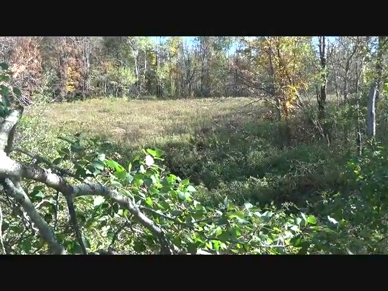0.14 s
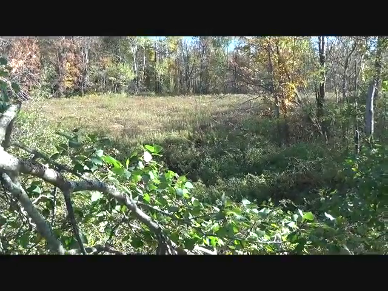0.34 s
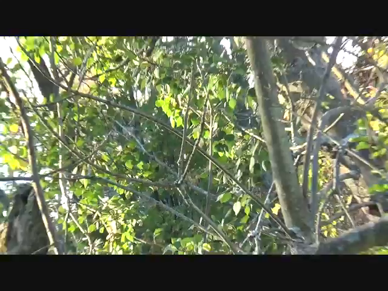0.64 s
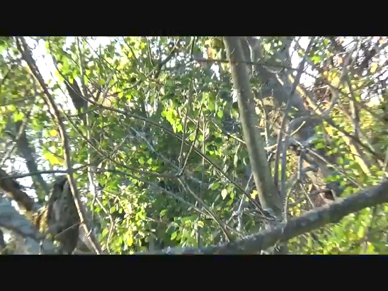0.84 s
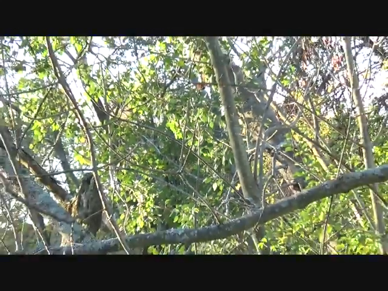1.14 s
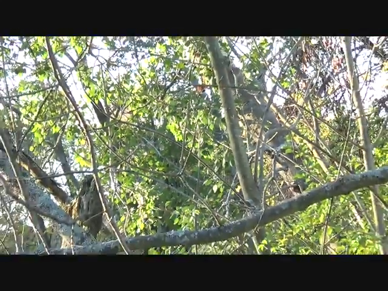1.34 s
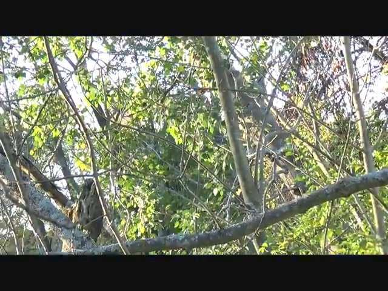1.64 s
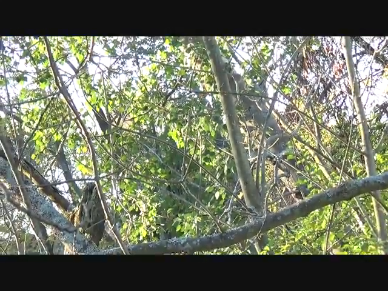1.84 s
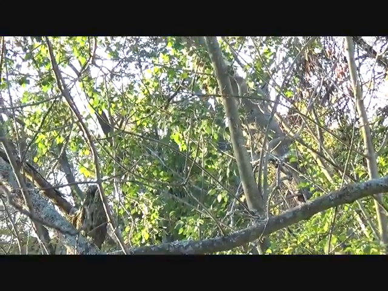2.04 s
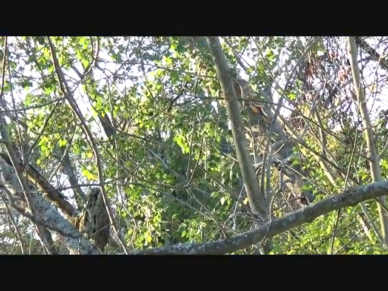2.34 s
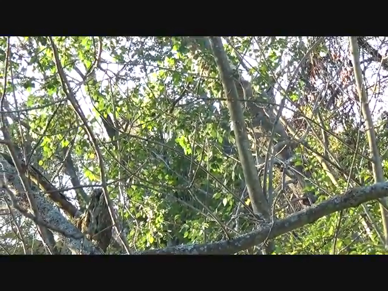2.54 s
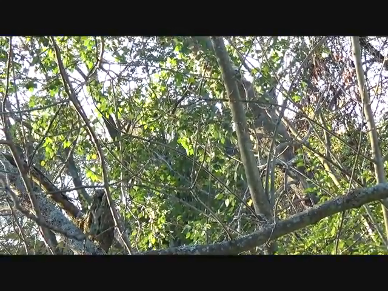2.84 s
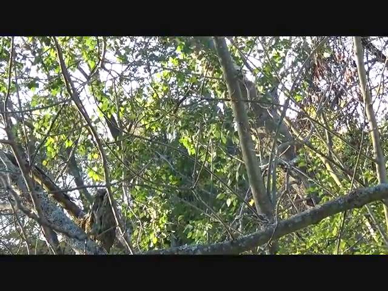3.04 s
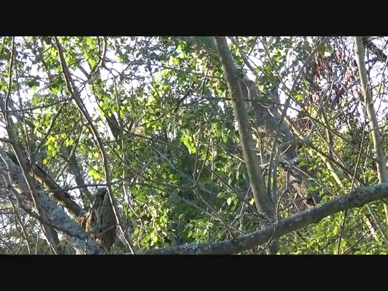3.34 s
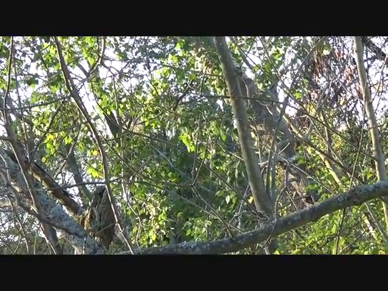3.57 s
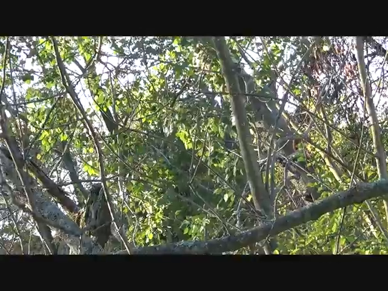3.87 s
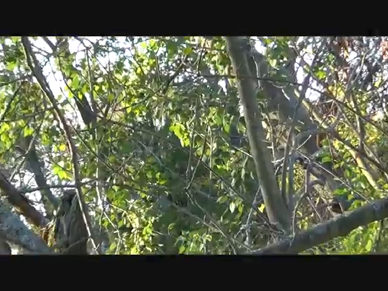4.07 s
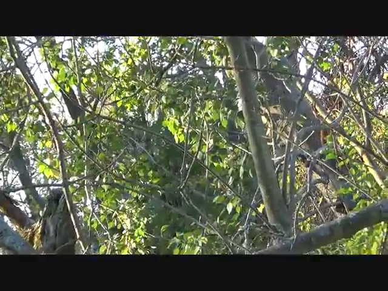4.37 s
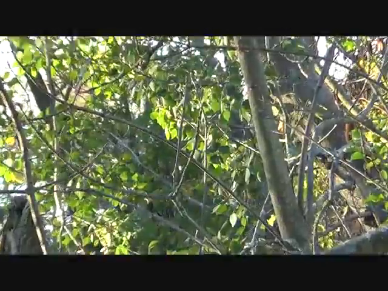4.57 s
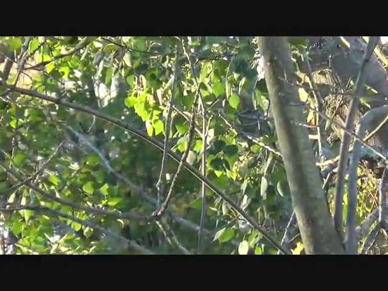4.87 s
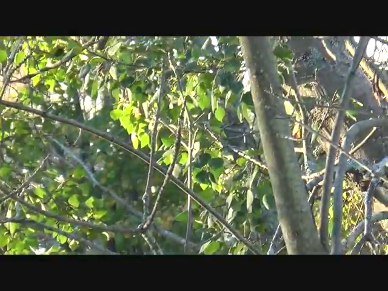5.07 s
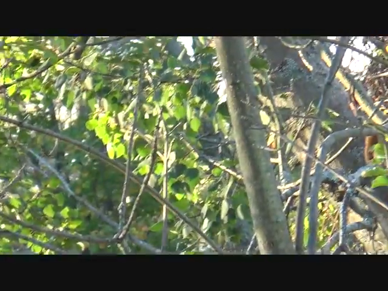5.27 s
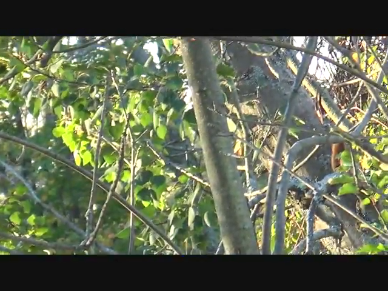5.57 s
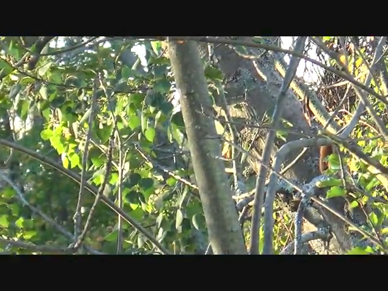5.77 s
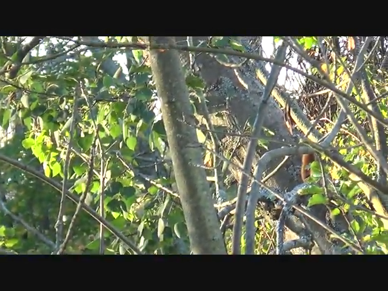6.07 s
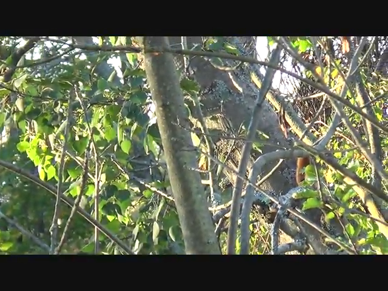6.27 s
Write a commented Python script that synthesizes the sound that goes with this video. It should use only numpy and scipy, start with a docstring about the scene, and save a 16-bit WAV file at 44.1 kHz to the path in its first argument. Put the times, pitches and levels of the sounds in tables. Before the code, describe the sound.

Soft outdoor air among trees runs throughout, with a faint distant engine drone, a thin, very high electronic whine and occasional faint bird whistles. The level drops for an instant at about 0.6 seconds. From 0.8 to 1.3 seconds, small twig ticks and soft knocks sound close by, followed by one sharp snap at 1.4 and a few more faint ticks just before 3 seconds. At about 3.7 seconds a squirrel straight ahead starts a loud, rapid rattle of sharp, squeaky, buzzing notes, lightly scattered by leaves and trunks. It begins tense and bright, then softens in tone and slows, stopping at about 6 seconds. A harder click comes near 4 seconds, and several soft knocks follow until about 5.2. The air and leafy rustle swell a little from 4 seconds and carry on to the end, around 6.4 seconds.

```python
"""Under the trees, a squirrel rattles off some sixty sharp notes that slow down at the end.
Each note is a tiny falling squeak and a dozen voice pulses, scattered back by leaves and trunks.
Twigs tick and small knocks sound close by, before and during the call. Behind them are soft outdoor
air, a far engine, faint birds and the thin whine of a camera. Early on, the level dips briefly."""
import sys
import numpy as np
from scipy import signal
from scipy.fft import rfft, irfft
from scipy.io import wavfile
from scipy.ndimage import uniform_filter1d

SR = 44100
rng = np.random.default_rng(int(sys.argv[2]) if len(sys.argv) > 2 else 0)


def unload_wav(signal):
    """Save mono or channel-first audio to the path in sys.argv[1] as 16-bit WAV at rate SR, clipped to [-1, 1]."""
    wavfile.write(
        sys.argv[1],
        SR,
        np.round(np.clip(np.atleast_2d(signal).T, -1, 1) * 32767).astype(np.int16),
    )


N = 282681
TIME = np.arange(N) / SR

# the voice starts tense and bright, then relaxes: (time [s], effort [dB], pitch [Hz], brightness [dB])
VOICE = [(3.67, -30, 1147, 5), (3.7, -27.5, 976, 5.5), (3.81, -26.5, 959, 9), (4.08, -24.5, 949, 9.5),
         (4.32, -25.3, 951, 5.5), (4.4, -26, 966, -2), (4.75, -23.6, 956, -2.5), (5.2, -24, 906, -2.5),
         (5.97, -25, 896, -5.7), (6.04, -28.5, 755, -5)]
# the rattle slows down: (time [s], pace [notes per second])
PACE = [(3.67, 31.01), (3.73, 29.5), (4.85, 26.19), (5.03, 24.71), (5.2, 25.22), (5.55, 22.67),
        (5.72, 19.77), (5.87, 19.79), (5.98, 15.85)]


def squirrel(start_s=3.6698, end_s=6.06):
    """The squirrel calls note after note, each a little different by chance."""
    out, s = np.zeros(N), start_s
    while s < end_s:
        effort_db, pitch_hz, bright_db = follow(VOICE, s)
        louder, higher, brighter = rng.standard_normal(3)
        age = s - start_s
        sound = note(pitch_hz * (1 + .02 * higher), bright_db + .5 * brighter,
                     squeak_db=-.4 * bright_db,  # a relaxed throat squeaks more
                     chest_db=-31 - age - effort_db,  # ignores effort, fades 1 dB a second
                     length_s=.012 + .00065 * age)
        add(out, s - .0038, gain_of(effort_db + .6 * louder) * sound)  # the squeak comes just ahead
        s += 1 / follow(PACE, s)[0]
    return out


# the lower part of the voice: (frequency [Hz], gain [dB])
CHEST_TONE = [(500, -42), (780, -5), (920, -5), (1350, -23), (1950, -12.5), (2400, -12), (2900, -6),
              (4000, -1), (4600, 4.5), (5600, -3.5), (6400, 1.5), (7400, -7.5), (9000, -17.5), (16000, -42)]
# the upper part of the voice: (frequency [Hz], gain [dB])
THROAT_TONE = [(3000, -41.5), (7000, -40), (8300, -15.5), (9100, -6.5), (9900, 1), (10600, -3.5),
               (11300, -1.5), (12200, 0), (13300, -3), (13900, -15.5), (16000, -16)]


def note(pitch_hz, bright_db, squeak_db, chest_db, length_s, jitter=.024, flutter_db=1.6, size=2048):
    """A falling squeak breaks into a short run of pulses that slow as the mouth closes."""
    t, hz = np.arange(size) / SR, np.fft.rfftfreq(size, 1 / SR)
    later, louder = rng.standard_normal((2, 24))
    progress = np.minimum(np.arange(24) / (pitch_hz * length_s), 1)
    fall = .2715 * (1 + .16 * rng.standard_normal())  # no two notes drop alike
    pulse_hz = pitch_hz * np.exp(-fall * (progress - .42))
    pulse_s = .0035 + np.cumsum((1 + jitter * later) / pulse_hz)
    age = (pulse_s - pulse_s[0]) / length_s  # pulses past 1 are silent
    push = np.interp(age, [0, .2, .55, .8, 1], [.3, .62, .78, .53, .31], right=0)
    push *= gain_of(flutter_db * louder)
    delays = np.exp(-2j * np.pi * hz[:, None] * pulse_s)  # puts each pulse at its time
    rasp = .09 * np.interp(t, pulse_s, push, left=0) * rng.standard_normal(size)
    top_band = np.exp(-((hz - 12250) / 1550) ** 4)  # a tense throat rings more up here
    throat = colour(irfft(delays @ push) + rasp, read(THROAT_TONE, hz) + (bright_db - 3.5) * top_band)
    closing = gain_of(-13 * np.clip(age - .25, 0, 1))  # the closing mouth fades only the lower part
    chest = colour(irfft(delays @ (push * closing)) + rasp, read(CHEST_TONE, hz))
    buzz = (unit_rms(throat) + gain_of(chest_db - 3.5) * unit_rms(chest)) * np.sqrt(length_s * SR / size)
    low = gain_of(-12) * squeak(t, .00311, .001, 3745, -420000)
    high = gain_of(-4.5) * squeak(t, .00485, .0018, 9450, -260000)
    return buzz + gain_of(squeak_db) * (low + high)


def squeak(t, middle_s, spread_s, centre_hz, slide_hz_per_s):
    """A clean whistle slides down for a few milliseconds."""
    hz = centre_hz * (1 + .0228 * rng.standard_normal()) + slide_hz_per_s * (t - middle_s)
    return np.exp(-.5 * ((t - middle_s) / spread_s) ** 2) * np.sin(2 * np.pi * np.cumsum(hz) / SR)


# dry twig ticks: (time [s], peak of the snap [dB])
TWIGS = [(.782, -43), (1.1166, -34), (1.16, -38), (1.224, -38.5), (1.261, -42), (1.41, -13), (2.707, -39),
         (2.788, -32), (2.949, -36.5)]


def twigs(faint_per_s=3, faint_db=-47):
    """Each twig gives a bright snap over duller wood; the smallest tick at random."""
    out = np.zeros(N)
    faint = [(s, faint_db) for s in TIME[rng.random(N) < faint_per_s / SR]]
    for s, db in TWIGS + faint:
        snap = burst(db, centre_hz=9500, octaves=.38, decay_s=.00062)
        wood = burst(db - 12.5, centre_hz=2400, octaves=2.6, decay_s=.0024)
        add(out, s, snap + wood)
    return out


# soft knocks close by: (time [s], peak of the thud [dB], centre [Hz], decay [s])
KNOCKS = [(.957, -38.5, 1200, 0.0079), (.989, -30, 1070, 0.0056), (1.032, -35.5, 990, 0.0031),
          (4.095, -31, 990, .01), (4.294, -30, 1490, 0.0019), (4.402, -26.5, 2110, 0.0039),
          (4.676, -30, 1470, .0058), (4.734, -34, 1086, .0033), (4.77, -34, 1090, 0.0019),
          (5.1553, -26, 1800, .0013)]


def knocks():
    """Each knock is a dull thud with a small contact click and a hollow ring."""
    out = np.zeros(N)
    for s, db, centre_hz, decay_s in KNOCKS:
        thud = burst(db, centre_hz, octaves=.58, decay_s=decay_s)
        click = burst(db - 7, centre_hz=4700, octaves=.34, decay_s=.0026)
        hollow = burst(db - 7, centre_hz=980, octaves=.2, decay_s=.006)
        add(out, s, thud + click + hollow)
    return out


def clink(at_s=3.971, db=-15):
    """One harder knock rings briefly over a duller body."""
    out = np.zeros(N)
    ring = burst(db, centre_hz=4820, octaves=.16, decay_s=.0022)
    body = burst(db - 12, centre_hz=1740, octaves=1.1, decay_s=.0022)
    add(out, at_s, ring + body)
    return out


def burst(db, centre_hz, octaves, decay_s, size=2048):
    """A snap and a short crumble of noise ring around one frequency, peaking at db."""
    t, hz = np.arange(size) / SR, np.fft.rfftfreq(size, 1 / SR)
    crumble = rng.standard_normal(size) * np.exp(-t / decay_s) + 2 * (t == 0)
    ring_db = -14 * np.log10(1 + (np.log2((hz + 1) / centre_hz) / octaves * 2) ** 2)
    bass_cut_db = -10 * np.log10(1 + (680 / (hz + 20)) ** 6)
    sound = colour(crumble, ring_db + bass_cut_db)
    return gain_of(db) * sound / abs(sound).max()


# how long the far echo lasts: (frequency [Hz], time to fade by 60 dB [s])
ECHO_FADE = [(500, 0.047), (3000, 0.44), (10000, .32), (15000, 0.2)]
# the tone of the far echo: (frequency [Hz], gain [dB])
ECHO_TONE = [(1000, 5.5), (4500, 0), (7000, 2), (9900, -2), (11500, 2.5), (13000, -4), (15000, -9)]


def tree_echoes(x, near_db=-11, near_decay_s=.02, far_db=-10, width=.17):
    """Nearby twigs scatter the sound at once; leaves and trunks further off give a thin tail."""
    t = np.arange(SR // 2) / SR
    shape = (2, 2, len(t))
    near, far = rng.standard_normal(shape) * (rng.random(shape) < .08) * (t > .0004)
    near = near * np.exp(-t / near_decay_s)
    hz, age, spectrum = signal.stft(far * (t > .005), SR, nperseg=256)
    tail_db = read(ECHO_TONE, hz)[:, None] - 60 * age / read(ECHO_FADE, hz)[:, None]
    far = signal.istft(spectrum * gain_of(tail_db), SR, nperseg=256)[1][:, :len(t)]
    echo = gain_of(near_db) * near / np.linalg.norm(near[0])
    echo += gain_of(far_db) * far / np.linalg.norm(far[0])
    mid, side = signal.fftconvolve(x[None], echo, axes=1)[:, :N]
    return np.array([mid + width * side, mid - width * side])


# the tone of the outdoor air: (frequency [Hz], gain [dB])
AIR_TONE = [(20, -41), (35, -39), (55, -23.5), (75, -8.5), (110, -1), (170, -2), (280, -6.5), (400, -8.5),
            (900, -8.5), (1400, -14.5), (2000, -20.5), (4000, -22.5), (8000, -25.5), (15000, -29.5)]
# the air changes abruptly at the dip, then swells from about 4 s:
# (time [s], low roar [relative dB], rustle [relative dB])
AIR_SWELL = [(0, -8, -6), (.6, -3, -6.5), (.7, .7, 1.3), (3.75, 1.7, 0.5), (4.4, 4.5, 6.5),
             (6.41, 5.5, 6.5)]
# how alike the two ears hear the air: (frequency [Hz], likeness [0 to 1])
LIKENESS = [(30, 0.35), (70, 0.59), (150, 0.97), (300, 0.87), (600, 0.91), (2000, 1), (15000, 0.87)]
# the rumble leans right: (frequency [Hz], gain added on the left and taken off the right [dB])
LEAN = [(30, 7), (70, -4.5), (150, -0.5), (300, 0)]


def air(calm_db=-53, patchy_db=1.5):
    """The outdoor air is a hush whose low roar and leafy rustle grow louder."""
    frames, hz = N // 256 + 5, np.fft.rfftfreq(1024, 1 / SR)
    a, b, c, d, patches = rng.standard_normal((5, frames, len(hz)))
    patches = unit_rms(uniform_filter1d(uniform_filter1d(patches, 14, axis=0), 8, axis=1))
    alike, lean = read(LIKENESS, hz), gain_of(read(LEAN, hz))
    left = a + 1j * b
    right = alike * left + np.sqrt(1 - alike ** 2) * (c + 1j * d)
    spectrum = np.array([left * lean, right / lean]) * gain_of(read(AIR_TONE, hz) + patchy_db * patches)
    roar_db, rustle_db = follow(AIR_SWELL, np.arange(frames)[:, None] * 256 / SR)
    roar_share = read([(300, .75), (700, .1)], hz)
    rustle_share = read([(300, .05), (700, .71), (1400, 1), (2500, .43), (9000, .43)], hz)
    swell = gain_of(roar_db * roar_share + rustle_db * rustle_share)
    calm, swelling = (signal.istft(z.swapaxes(1, 2), nperseg=1024, noverlap=768)[1][:, :N]
                      for z in (spectrum, spectrum * swell))
    return gain_of(calm_db) * swelling / calm.std()


# the engine picks up speed: (time [s], firing rate [Hz])
ENGINE_SPEED = [(0, 67.3), (.6, 68.3), (.8, 74.64), (2.4, 80.03), (4.6, 81.6), (6.41, 83.14)]
# its drone swells and sinks: (time of the top [s], length [s], top level [relative dB])
ENGINE_SWELLS = [(0.103, .28, -50), (0.475, .28, -48), (1.05, .4, -57), (2.45, 0.63, -57.5),
                 (4.65, 0.58, -51.5), (5.45, 0.53, -54.5), (6.22, 0.58, -51.5)]
# its tone through the trees: (frequency [Hz], gain [dB])
ENGINE_TONE = [(65, -19), (80, -7), (135, 1.5), (165, 1), (203, -10), (245, -15), (330, -22)]


def engine(floor_db=-65):
    """A far engine drones at its wavering firing rate and three overtones."""
    hz = follow(ENGINE_SPEED, TIME)[0]
    firings = np.cumsum(hz * (1 + .005 * wander(90))) / SR
    level = gain_of(floor_db)
    for s, length_s, db in ENGINE_SWELLS:
        level = np.maximum(level, gain_of(db) * (1 - (2 * (TIME - s) / length_s) ** 2))
    tones = (gain_of(read(ENGINE_TONE, k * hz)) * np.sin(2 * np.pi * k * firings) for k in (1, 2, 3, 4))
    return level * sum(tones)


# bird calls: (time [s], level [relative dB], start pitch [Hz], end pitch [Hz], length [s])
BIRDS = [(.008, -50, 3960, 3550, 0.022), (.155, -65, 5750, 5500, .03), (2.287, -57, 5870, 5300, 0.051),
         (2.651, -65, 2620, 2540, 0.16), (3.0, -69, 3180, 3170, 0.27), (6.372, -51, 3900, 3360, 0.019)]


def birds(waver=.045):
    """Far birds give thin, wavering whistles."""
    out = np.zeros(N)
    for s, db, start_hz, end_hz, length_s in BIRDS:
        count = int(length_s * SR)
        wobble = unit_rms(uniform_filter1d(rng.standard_normal(count), size=120))
        hz = np.linspace(start_hz, end_hz, count) * (1 + waver * wobble)
        add(out, s, gain_of(db) * np.hanning(count) * np.sin(2 * np.pi * np.cumsum(hz) / SR))
    return out


# the high tones of the camera's electronics: (frequency [Hz], average level [dB])
WHINE = [(15735, -57), (13250, -78)]


def camera_whine(flutter_db=1.5):
    """Two thin, steady high tones, with a slight flutter added to their level."""
    tones = sum(np.sqrt(2) * gain_of(db) * np.sin(2 * np.pi * hz * TIME) for hz, db in WHINE)
    return gain_of(flutter_db * wander(200)) * tones


def gain_of(db):
    """Turns decibels into a multiplier."""
    return 10 ** (np.asarray(db) / 20)


def unit_rms(x):
    """Scales a signal to an average strength (rms) of 1."""
    return x / np.sqrt(np.mean(x ** 2) + 1e-20)


def wander(count):
    """A wavy line through count random points."""
    return np.interp(TIME, np.linspace(0, TIME[-1], count), rng.standard_normal(count))


def read(points, hz):
    """Looks up a frequency table at hz, with octaves evenly spaced."""
    f, value = np.transpose(points)
    return np.interp(np.log(hz + 1), np.log(f + 1), value)


def follow(rows, t):
    """Looks up each column of a time table at t."""
    s, *columns = np.transpose(rows)
    return [np.interp(t, s, c) for c in columns]


def add(mix, s, sound):
    """Mixes a sound in at s seconds."""
    part = mix[max(round(s * SR), 0):][:len(sound)]
    part += sound[:len(part)]


def colour(x, db):
    """Turns each frequency of x up or down by db, ringing only after each pulse."""
    log_gain = np.log(gain_of(np.concatenate([db, db[-2:0:-1]])))
    return irfft(rfft(x) * np.exp(np.conj(signal.hilbert(log_gain)))[:len(db)])


DIP_S, DIP_WIDTH_S, DIP_DB = .646, .018, -21.5


def scene():
    """The squirrel is straight ahead, the taps are close, and the birds are heard only as echoes."""
    call, taps = squirrel(), twigs() + knocks() + clink()
    echoes = tree_echoes(call + gain_of(-17.5) * taps + gain_of(8) * birds())
    hush = air() * gain_of(5 * (TIME < DIP_S))  # turned up before the dip
    engine_pan = gain_of([[-2.5], [1.5]])  # toward the right
    return call + taps + echoes + camera_whine() + hush + engine() * engine_pan


def record(dry, cutoff_hz=15950):
    """The level dips once, briefly, and the very highest treble is cut off."""
    dipped = dry * gain_of(DIP_DB * np.exp(-((TIME - DIP_S) / DIP_WIDTH_S) ** 2))
    lowpass = signal.firwin(767, cutoff_hz, window=("kaiser", 9), fs=SR)
    return signal.oaconvolve(dipped, lowpass[None], "same")


dry = scene()
out = record(dry)
unload_wav(out)
```